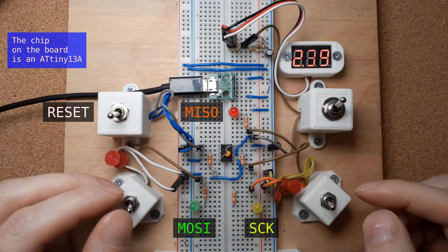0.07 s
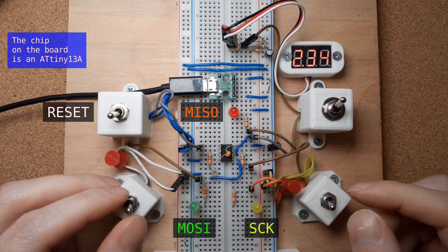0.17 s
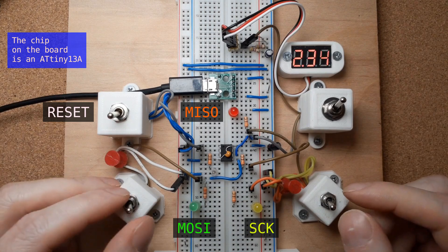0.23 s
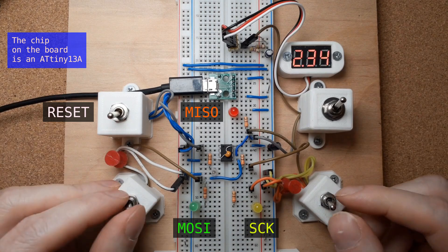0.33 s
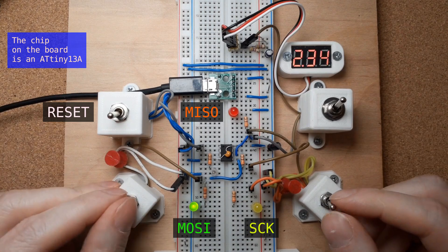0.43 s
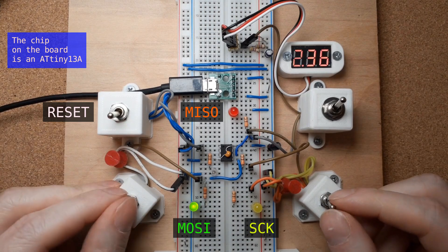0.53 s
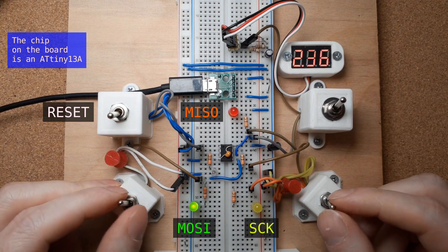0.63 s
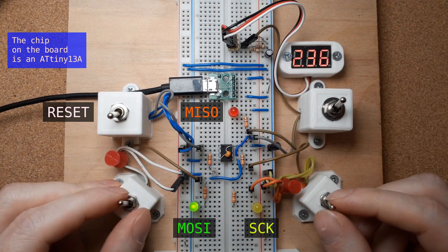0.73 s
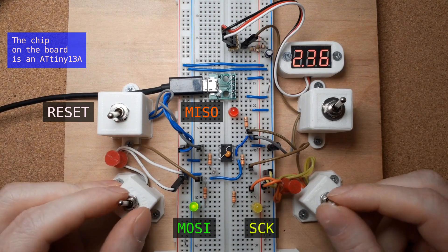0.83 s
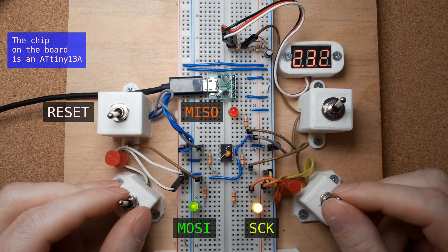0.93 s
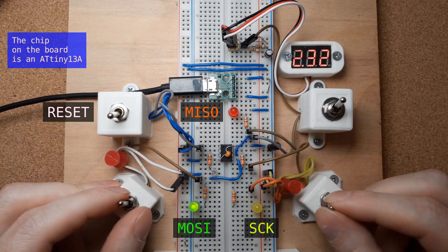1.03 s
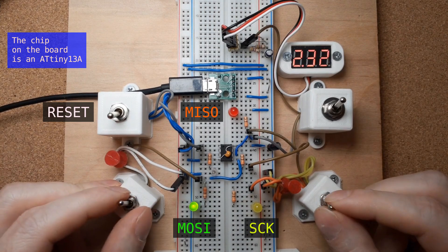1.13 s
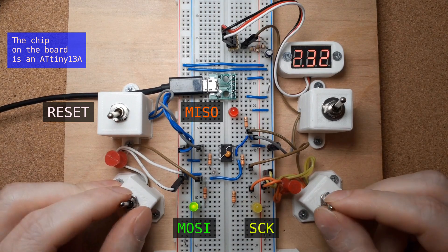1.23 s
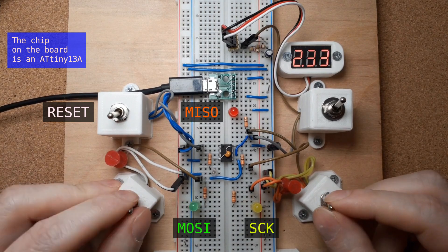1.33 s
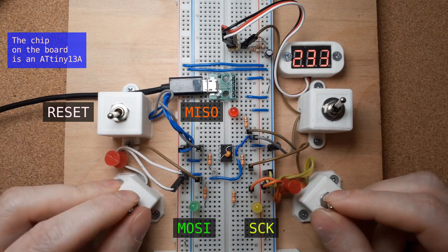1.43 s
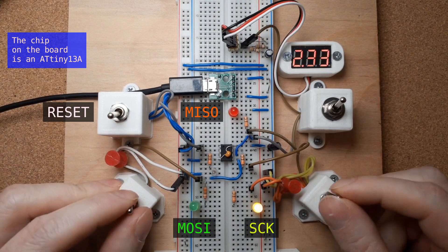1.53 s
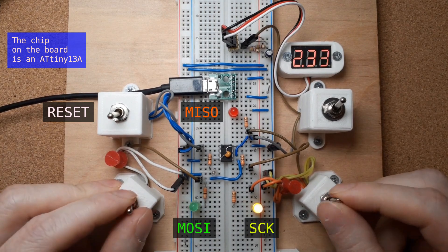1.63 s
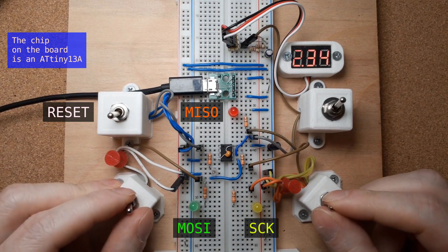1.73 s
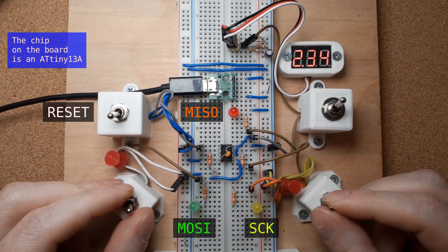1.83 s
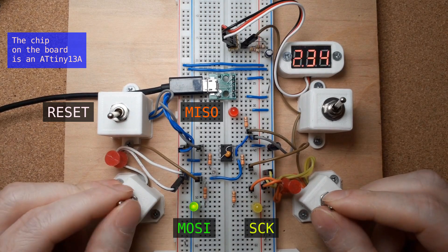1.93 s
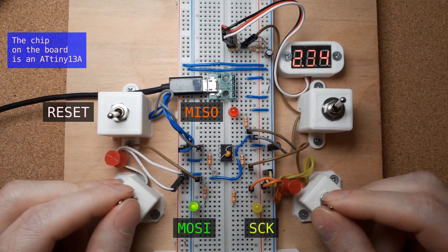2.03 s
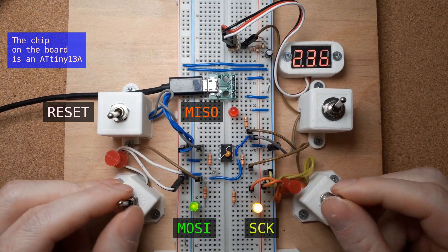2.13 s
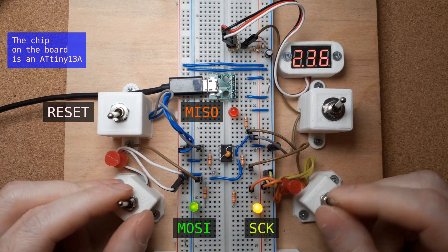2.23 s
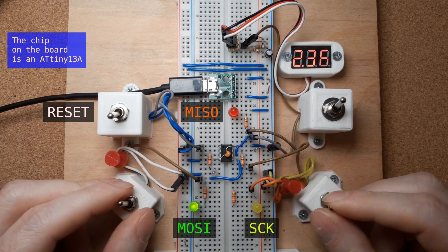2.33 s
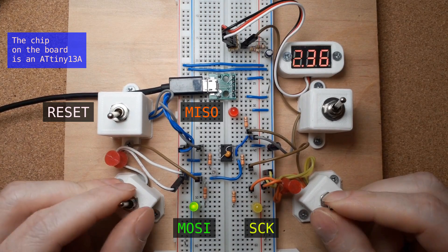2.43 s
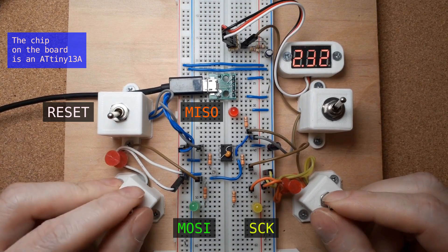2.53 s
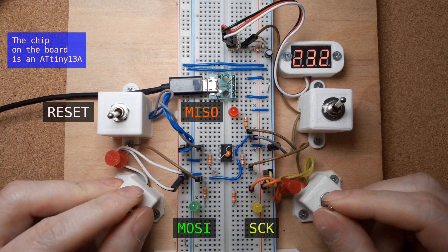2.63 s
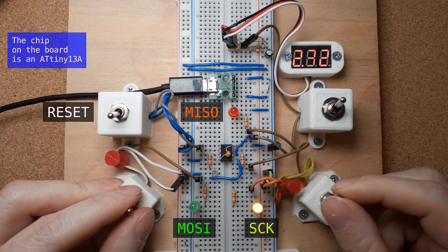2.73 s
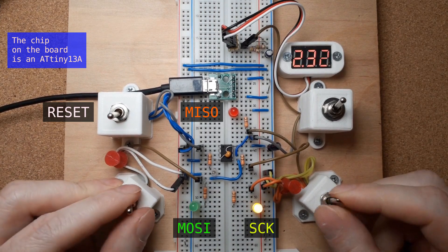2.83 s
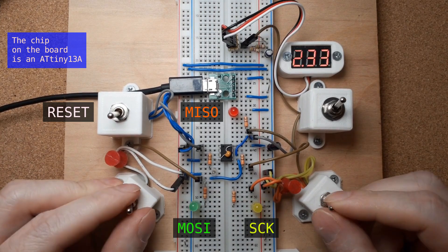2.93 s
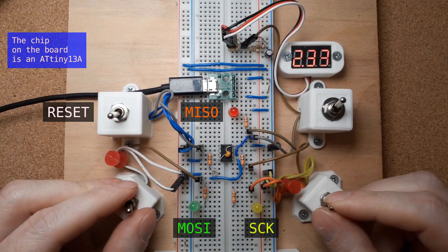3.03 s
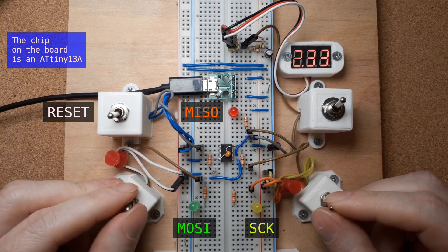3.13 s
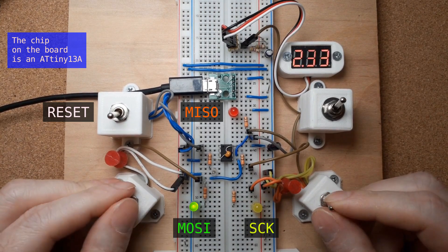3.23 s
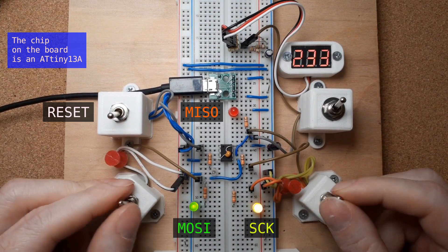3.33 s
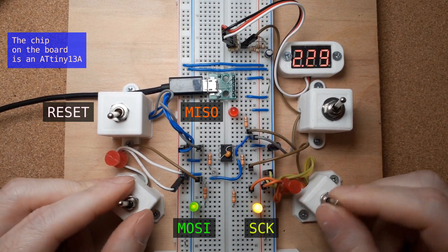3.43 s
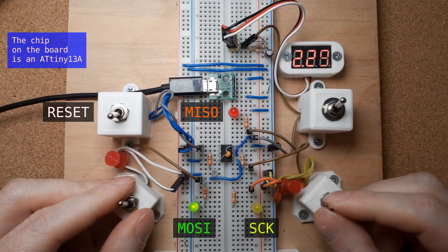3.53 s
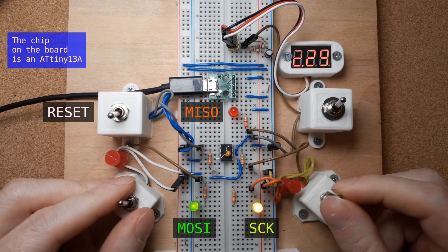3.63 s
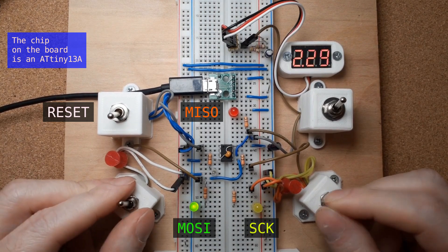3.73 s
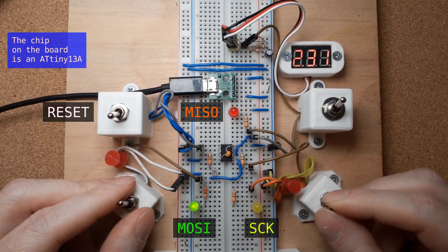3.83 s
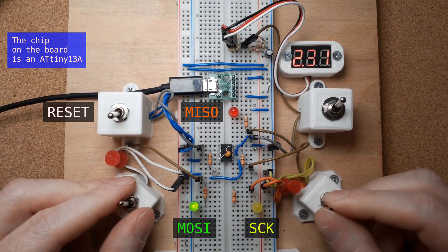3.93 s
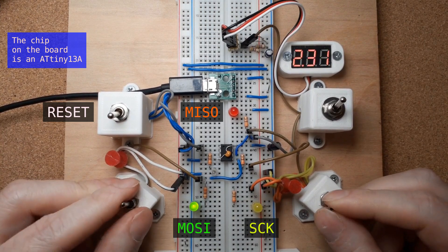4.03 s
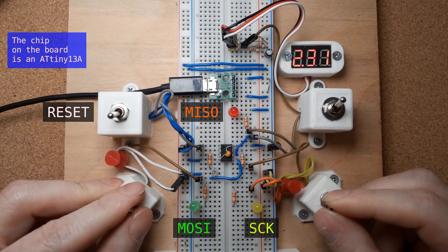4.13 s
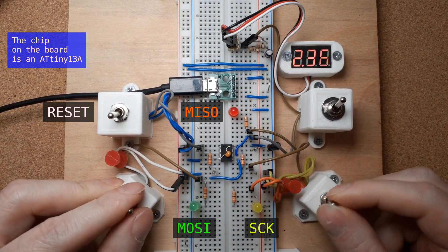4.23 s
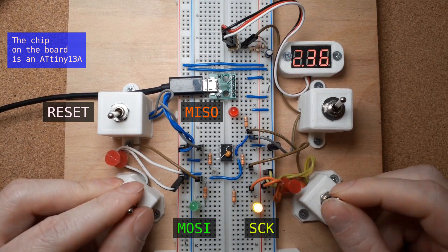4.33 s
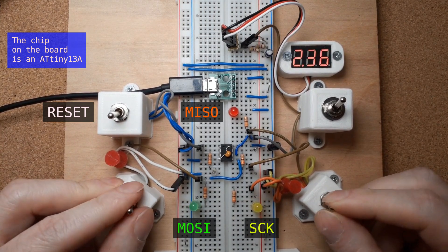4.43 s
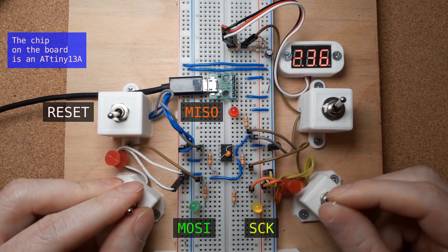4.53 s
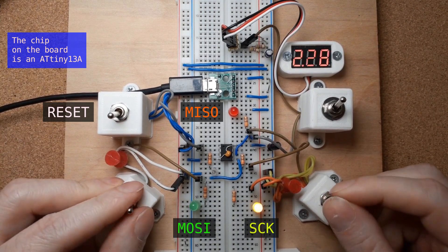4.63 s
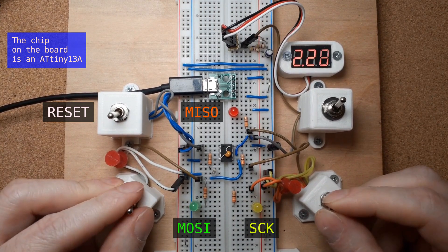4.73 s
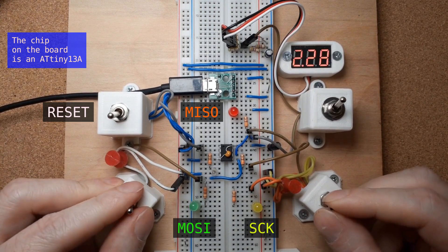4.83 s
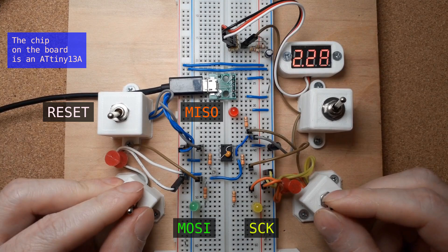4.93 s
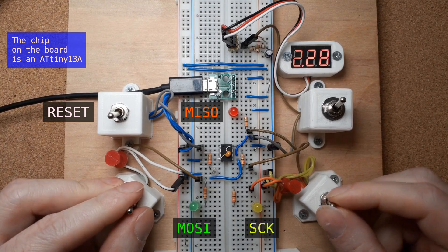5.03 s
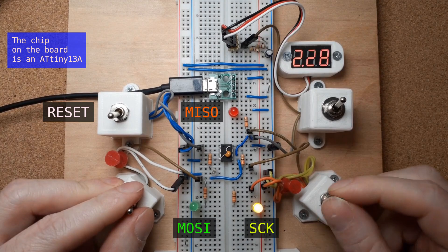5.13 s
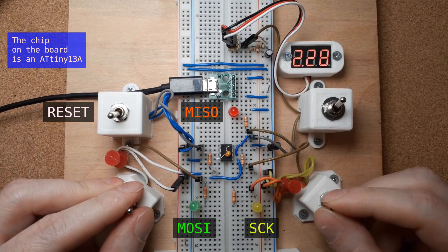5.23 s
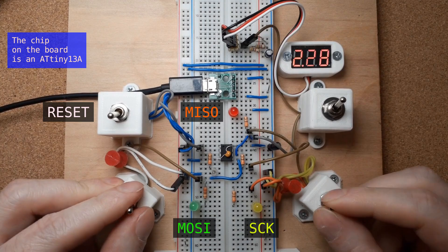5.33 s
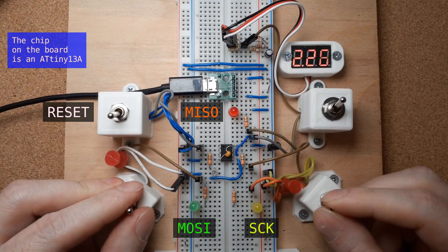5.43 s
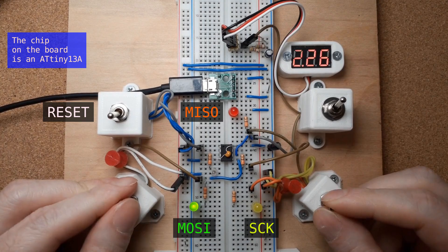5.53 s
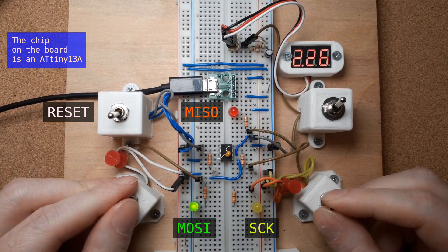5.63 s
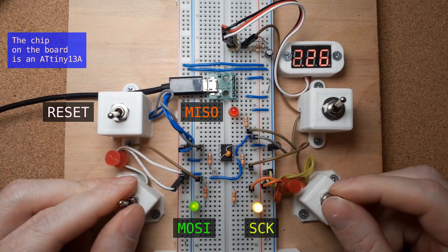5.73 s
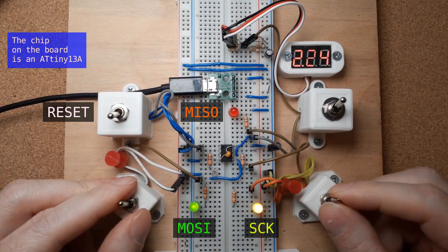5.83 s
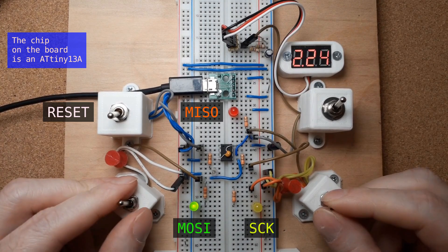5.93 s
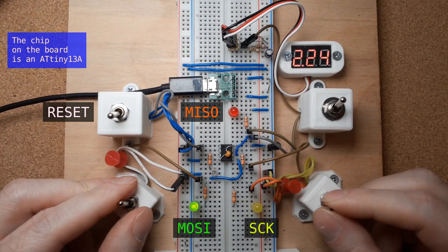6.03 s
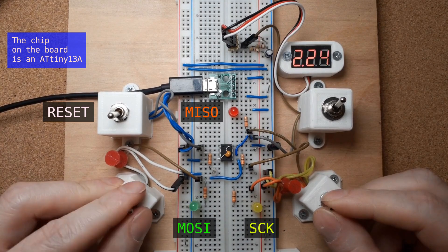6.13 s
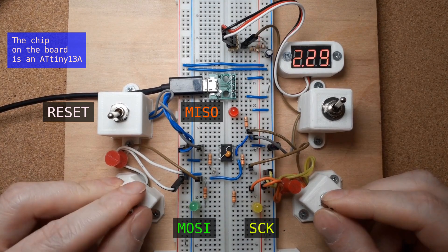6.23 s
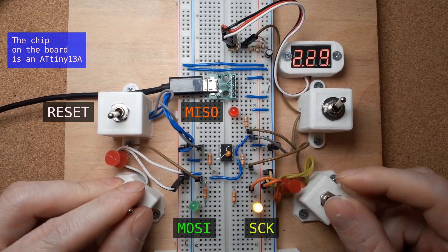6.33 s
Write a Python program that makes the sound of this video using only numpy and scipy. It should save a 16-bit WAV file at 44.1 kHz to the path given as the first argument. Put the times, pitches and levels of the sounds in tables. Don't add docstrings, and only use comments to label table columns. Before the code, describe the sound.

A faint room hiss with a barely audible distant fan tone fades in over the first 0.3 seconds, with very soft fingertip taps and nail ticks at 0.4. At 0.52 the left toggle switch snaps on. The right one clicks at 0.95, 1.11, 1.6 and 1.76, with a bright left snap off at 1.42. Left on at 2.03, right at 2.2, 2.34, then a very loud left off at 2.6, right at 2.8 and 2.95. Left on at 3.25, right clicks at 3.4, 3.54, 3.7, 3.83, left off at 4.14. Right flips in quick pairs from 4.34 to 5.3, left on at 5.61, right at 5.8 and 5.96, left off at 6.22, ending about 6.4. Each flip is a tiny tick, a hard plastic-and-metal crack, a weak rebound, and a low wooden bench thump with a short dry room tail. Light skin scuffs sit between, close stereo.

```python
import sys
import numpy as np
from scipy import signal
from scipy.fft import rfft, irfft, next_fast_len
from scipy.io import wavfile
from scipy.ndimage import uniform_filter1d

SR = 44100
rng = np.random.default_rng(int(sys.argv[2]) if len(sys.argv) > 2 else 0)


def generate_wav(sig):
    pcm = np.round(np.clip(np.atleast_2d(sig).T, -1, 1) * 32767).astype(np.int16)
    wavfile.write(sys.argv[1], SR, pcm)


def volts_from_db(level):
    exponent = np.asarray(level, float) / 20
    return 10 ** exponent


N = 281799
SIZE = 2048
PEAK_AT = 128

# (frequency [Hz], level [dB per Hz])
HISS = [(40, -20), (62, -13.5), (90, -28), (190, -36), (262, -24), (420, -39), (686, -43.5), (762, -40),
        (1140, -46), (1500, -45.5), (1600, -41), (1740, -48.5), (15500, -57.5), (16000, -75.5)]
# (frequency [Hz], likeness [0-1])
HISS_SAME = [(40, 0.85), (300, 0.94), (2000, 0.27), (16000, 0.89)]
# (frequency [Hz], level [dB rms])
HUM = [(764.4, -84), (1604, -87)]
# (time [s], level [dB])
FADE_IN = [(0, -12), (.15, -12), (.17, 0.5), (.3, 2.5), (6.39, 2.5)]
# (time [s], level [dB])
SWAY = [(0, -60), (.45, -62), (.54, -38.5), (.9, -41), (.98, -31), (1.27, -34.5), (1.37, -55), (1.46, -37),
        (2.1, -32.5), (3.8, -31.5), (4.3, -34.5), (4.8, -33), (5.15, -45), (5.25, -31), (5.47, -40.5),
        (6.07, -35), (6.15, -48), (6.27, -37.5)]
# (frequency [Hz], level [dB per Hz])
TREMOR = [(30, -15.5), (50, 0), (80, -4), (130, -14), (200, -31.5), (400, -54)]
# (frequency [Hz], t60 [s])
ROOM = [(200, 0.55), (1000, 0.081), (3000, 0.14), (7000, 0.14), (15000, 0.17)]
# (frequency [Hz], level [dB])
ROOM_COLOUR = [(150, 0.5), (600, -1), (1500, 6.5), (2500, 0), (5000, -1), (9000, -1), (12000, -2.5),
               (14500, -7), (16000, -11)]
# (frequency [Hz], level [dB per Hz])
BENCH_RING = [(45, -32.5), (90, 5.5), (140, -7.5), (260, 7.5), (450, 4.5), (700, -9.5), (1500, -43)]
# (frequency [Hz], level [dB per Hz])
RUB_COLOUR = [(150, -8.5), (500, -1.5), (1500, -9), (3000, -10.5), (5000, -13), (15500, -20), (16000, -60)]
# (time [s], level [dB])
GRIP = [(.1, -81), (.7, -73.5), (3.1, -74), (3.5, -76), (4.2, -73.5), (4.9, -75.5), (6.25, -75),
        (6.39, -61.5)]
# (start [s], end [s], level [dB], left-right [dB])
SCUFFS = [
    (0.73, 0.86, -68, -19),
    (0.83, 0.905, -60, -18),
    (0.9, 0.946, -64, -10),
    (3.192, 3.233, -51.5, 5),
    (3.355, 3.414, -57, -1),
    (3.752, 3.795, -59, -24),
    (5.099, 5.14, -59, -5.5),
    (5.524, 5.583, -62, 5.5),
]
# (frequency [Hz], level [dB per Hz])
SCUFF_COLOUR = [(200, -12), (600, -1), (1300, 3.5), (2500, -3.5), (4000, -22), (16000, -31)]
# (time [s], level [dB], left-right [dB])
TICKS = [(0.4026, -46.5, 2), (.409, -50.5, 5), (0.4383, -49, 0.5), (0.4695, -28, 1.5), (0.9094, -38.5, -2),
         (1.298, -56, 0), (1.311, -55, 6), (2.013, -46, 3), (2.1747, -45.5, -1), (2.197, -49, -11),
         (2.5195, -50.5, 4), (2.7483, -50, -1), (2.7708, -39, 1.6), (3.2307, -52, -13), (3.6604, -41, 7.5),
         (3.675, -44, -12), (3.7891, -52, 9), (4.2912, -55, -7), (4.321, -42.5, -3), (4.425, -44.5, -1),
         (4.615, -41.5, -1), (4.7378, -40.5, 1.1), (5.122, -38.5, -3), (5.258, -39.5, -2.3),
         (5.5641, -44, 7), (5.5845, -41, -3), (5.7748, -43, -4), (5.8887, -41.5, -1.5), (6.1807, -46, 3),
         (6.3837, -39.5, -4)]
# (time [s], tick [dB], dull part under 1 kHz [dB], left-right [dB])
TAPS = [(0.1644, -66, -68, 3), (0.293, -77, -60, 9), (0.6802, -68, -53.5, 5), (0.8835, -58, -66, -18),
        (0.9235, -54, -58, -3), (0.698, -75, -57, 3), (1.0275, -51, -67, -1), (1.3615, -62.5, -61, 4),
        (1.418, -30.5, -29, 1.5), (1.5728, -59, -53, -3), (1.9906, -40.5, -45, 3), (2.5954, -30.5, -31, -1),
        (2.8771, -52, -66, 0), (3.0967, -49, -46.5, 4), (3.2005, -56, -48, 1), (3.2115, -38, -43, 3.5),
        (3.2214, -47, -63, -8), (3.361, -58, -56, 1), (3.373, -51, -54, -1.5), (3.3941, -45, -46, -2),
        (3.487, -55, -42, 1), (3.493, -38, -38, 2), (3.771, -71, -50, -15), (3.8195, -69, -36, -4),
        (4.0631, -45.5, -61, 8), (4.1333, -78.5, -32, 4.5), (5.5477, -53, -45.5, 2), (5.951, -54, -46.5, 0)]
# (frequency [Hz], width [Hz], level [dB])
TOUCH_BODY = [(1290, 43, -2.5), (2070, 580, -10), (3930, 170, -8.5), (6140, 960, -5), (7160, 150, -4.5),
              (8800, 500, -5), (10900, 400, -9.5), (12300, 270, -8.5), (13400, 130, -12), (14800, 400, -10)]
# (lead [s], first pitch [Hz], last pitch [Hz], glide [s], rise [s], t60 [s], level [dB])
LEFT_WAVE = [
    (.0045, 230, 90.6, 0.0045, 0.003, 0.055, -0.5),
    (.0045, 220, 87.9, 0.0035, 0.003, 0.075, -0.5),
]
RIGHT_WAVE = [
    (0.0082, 153, 79.9, 0.012, 0.0014, 0.13, -0.59),
    (.0095, 242, 75.1, 0.0041, 0.0029, 0.066, -0.33),
]
# (frequency [Hz], level [dB], t60 [s])
LEGS = (28, -15.5, 0.76)
# (frequency [Hz], level [dB], t60 [s])
LEFT_KNOCK = [(250, -22, .022), (420, -18, .022), (780, -17, .02), (1400, -33, .06)]
RIGHT_KNOCK = [(265, -17, .022), (420, -16, .024), (700, -21, .022), (1800, -31, .065)]
# (time [s], low [dB], middle [dB], high knock [dB])
SEATING = [(0.52, 8, 12, 5), (0.95, 10, 8, 2), (1.11, -7, 1, -1), (1.42, 12, 6, 2), (1.61, 9, 9, 13),
           (1.76, 9, -1, 0), (2.03, 17, 1, 10), (2.22, 17, 12, 10), (2.34, 13, 8, 9), (2.6, 15, 11, 8),
           (2.79, 9, 7, 9), (2.95, 16, 10, 14), (3.25, 9, -1, 7), (3.42, 16, 10, 11), (3.54, 8, 2, 4),
           (3.7, 17, 14, 10), (3.83, 4, 4, 2), (4.14, 16, 14, 10), (4.34, 17, 14, 1), (4.48, 3, 2, 2),
           (4.64, 11, 5, 6), (4.79, 2, 5, 3), (5.16, -2, -3, 3), (5.3, 5, 2, 4), (5.61, 12, 9, 9),
           (5.79, 16, 7, -4), (5.96, 15, 5, 0), (6.22, 13, 12, 13)]
# (time of main swing [s], peak level [dB], pitch ratio set by how the hand holds the housing down)
LEFT_ON_THUMPS = [
    (0.5223, -24.3, 0.96),
    (2.0335, -22.4, 1.11),
    (3.2515, -19.8, 1.11),
    (5.6118, -19.1, 1.08),
]
LEFT_OFF_THUMPS = [
    (1.425, -20.8, 1.27),
    (2.6012, -23.5, 1.3),
    (4.1422, -21.5, 1.3),
    (6.2195, -20.6, 1.4),
]
RIGHT_ON_THUMPS = [(0.9552, -25.0, 0.87), (1.6139, -23.6, 0.95), (2.2235, -26.2, 0.83),
                   (2.7982, -27.6, 0.93), (3.429, -25.1, 0.85), (3.706, -27.0, 0.86), (4.3483, -26.1, 0.98),
                   (4.6425, -27.1, 0.97), (5.1692, -28.2, 0.97), (5.801, -26.4, 0.93)]
RIGHT_OFF_THUMPS = [(1.1149, -21.0, 0.89), (1.764, -19.9, 1.05), (2.3446, -24.7, 1.01),
                    (2.9599, -22.5, 1.08), (3.544, -21.4, 1.05), (3.8357, -18.0, 1.01),
                    (4.4814, -18.8, 1.07), (4.7923, -17.1, 1.08), (5.3087, -19.3, 1.11),
                    (5.9682, -22.7, 1.02)]
# (frequency [Hz], width [Hz], level [dB])
LEFT_BODY = [(1325, 170, 10), (3210, 160, 1.5), (2130, 1400, 0.5), (4150, 1500, -2.5), (4700, 53, -5.5),
             (6060, 210, -1), (7330, 590, -3.5), (8950, 150, -18), (10050, 1000, -14.5), (11080, 140, -9),
             (13100, 77, -9), (13200, 220, -14.5), (14800, 280, -14.5), (16300, 130, -25)]
RIGHT_ON_BODY = [(1290, 47, -5.5), (1700, 1400, 2.5), (2310, 24, 1), (3422, 70, -0.5), (4090, 97, -4.5),
                 (5450, 450, -3), (6704, 520, -1.5), (7830, 840, -7), (4200, 760, -7), (8900, 210, -8),
                 (10740, 400, -10), (10530, 670, -8), (12000, 410, -8), (14400, 300, -9)]
RIGHT_OFF_BODY = [(1330, 33, 1), (1834, 160, -1), (2305, 40, -4), (3180, 350, -8), (4080, 360, -7),
                  (4840, 50, -11), (4940, 50, -12), (6970, 2100, -3), (8290, 350, -4.5), (9600, 57, -6),
                  (11440, 1100, -4), (12600, 130, -25), (13500, 230, -45.5), (14600, 470, -6)]
# (time [s], frequency [Hz], lift [dB], frequency [Hz], lift [dB])
LOW_SINGING = [(0.52, 2440, 8, 3220, 9), (0.95, 1730, 10, 3220, 10), (1.11, 1730, 11, 2050, 2),
               (1.42, 1220, -9, 1790, 7), (1.61, 1730, 4, 1980, -6), (1.76, 1500, 7, 2620, 8),
               (2.03, 2530, 13, 3570, 7), (2.22, 1730, 11, 3110, 6), (2.34, 1850, 4, 2620, 4),
               (2.6, 1980, 6, 2620, 9), (2.79, 1220, -4, 3450, -9), (2.95, 1920, 6, 2620, 10),
               (3.25, 1500, -7, 2620, 12), (3.42, 1980, 3, 2360, -6), (3.54, 1400, -4, 1730, 8),
               (3.7, 1730, 7, 2710, 6), (3.83, 1730, 6, 2280, -6), (4.14, 1790, 6, 2130, 8),
               (4.34, 1140, 8, 1790, 12), (4.48, 1350, -9, 1670, 7), (4.64, 1850, 11, 3330, 5),
               (4.79, 1560, 10, 3450, 6), (5.16, 2440, 6, 3330, -6), (5.3, 1220, -9, 1730, 2),
               (5.61, 1260, 7, 2710, 13), (5.79, 1850, 6, 3450, 8), (5.96, 1350, -9, 1730, 5),
               (6.22, 2200, 7, 2620, 10)]
HIGH_SINGING = [(0.52, 3920, 11, 6170, -5), (0.95, 7320, 2, 9720, 6), (1.11, 7110, 5, 8200, -8),
                (1.42, 3700, 5, 7530, 4), (1.61, 6000, 6, 6720, 5), (1.76, 6000, 5, 7110, 10),
                (2.03, 4030, -6, 4780, 5), (2.22, 6000, 3, 7110, 7), (2.34, 6910, 6, 9450, -9),
                (2.6, 3920, 6, 5830, -9), (2.79, 4150, 7, 5830, 6), (2.95, 6170, 6, 7110, 7),
                (3.25, 4030, 9, 5830, -7), (3.42, 3920, 5, 7530, 7), (3.54, 5830, 9, 6910, 6),
                (3.7, 4030, 8, 6000, 4), (3.83, 6000, 6, 8680, -9), (4.14, 4640, -5, 5200, 6),
                (4.34, 5830, 4, 7320, 11), (4.48, 4030, -9, 4640, -7), (4.64, 6170, 4, 7320, 5),
                (4.79, 6170, 6, 7740, 7), (5.16, 4150, 7, 4780, 8), (5.3, 4780, -5, 7320, 5),
                (5.61, 4780, 8, 5830, 5), (5.79, 5510, -5, 6720, 5), (5.96, 6000, 8, 7320, 7),
                (6.22, 7110, -5, 10000, -8)]
# (fixed part [Hz], share of the pitch [ratio])
SINGING_WIDTH = (170, 0.05)
# (time of contact strike [s], level [dB], treble over middle [dB], lever tick ahead [s], tick [dB])
LEFT_ON_FLIPS = [
    (.5205, -10.5, 2, 0.0092, -30.5),
    (2.0315, -11.5, 1, .0081, -25.5),
    (3.2498, -12, 0.5, .0096, -31),
    (5.6118, -10.5, 4, .013, -21.5),
]
LEFT_OFF_FLIPS = [
    (1.424, -7, 4.5, .003, -28.5),
    (2.6, -5.5, 4.5, .003, -31.5),
    (4.1407, -6, 3, .0032, -21),
    (6.2179, -9, -0.5, .0059, -28),
]
RIGHT_ON_FLIPS = [
    (.9472, -12, 2, .002, -27),
    (1.608, -17, -5.5, 0.0026, -17),
    (2.217, -18.5, -8.5, .0025, -12),
    (2.791, -7.5, -1.3, .0025, -24.5),
    (3.4225, -15.5, 2, 0.0031, -18.5),
    (3.7008, -18.5, -2, .0033, -18.5),
    (4.3422, -11, 1, .0032, -17.5),
    (4.6364, -15, -1.5, .0019, -12),
    (5.1622, -7.5, -0.8, 0.0012, -25.5),
    (5.793, -7, 3.5, .0025, -24),
]
RIGHT_OFF_FLIPS = [
    (1.1075, -16.5, 1, .0033, -22.5),
    (1.758, -20.5, -6, .0031, -13),
    (2.3388, -10.5, 3, 0.0021, -22),
    (2.9544, -8, -3, .002, -24.5),
    (3.5385, -19, -9, .0024, -13),
    (3.8299, -16.5, 1, 0.0038, -18.5),
    (4.4756, -15.5, -4, 0.0058, -17),
    (4.7857, -15.5, -9, 0.0013, -14),
    (5.3025, -14, -4.5, 0.0029, -18),
    (5.9614, -15, 0, .0014, -18.5),
]
# (strike left-right [dB], tick left-right [dB], tick treble [dB], rebound after [s],
# rebound under strike [dB], rebound treble [dB], spring slip under strike [dB])
LEFT_ON_THROW = (.6, 4, 8, .0065, -17, -8, -13)
LEFT_OFF_THROW = (2.5, 6, 10, .0043, -18, -8, -30)
RIGHT_ON_THROW = (2.1, 1.1, 9, .0048, -18, -3, -30)
RIGHT_OFF_THROW = (.6, -1.1, 8, .0035, -17, -8, -30)


def evened(x):
    return x / np.sqrt(np.mean(x ** 2) + 1e-20)


def peaked(x, size):
    return x / np.sqrt(uniform_filter1d((x ** 2).mean(0), size).max())


def ragged(count, size):
    return evened(uniform_filter1d(rng.standard_normal(count), size=size))


def read(points, hz):
    f, value = np.transpose(points)
    return np.interp(np.log(hz + 1), np.log(f + 1), value)


def curve(rows):
    s, db = np.transpose(rows)
    return np.interp(np.arange(N) / SR, s, db)


def nearest(rows, s):
    return min(rows, key=lambda row: abs(row[0] - s))


def add(mix, s, sound, pan_db):
    part = mix[:, round(s * SR):][:, :sound.shape[1]]
    part += (sound * volts_from_db([[pan_db / 2], [-pan_db / 2]]))[:, :part.shape[1]]


def noise(spectrum, same):
    size = next_fast_len(N)
    hz = np.fft.rfftfreq(size, 1 / SR)
    a, b = rfft(rng.standard_normal((2, size)))
    like = np.clip(read(same, hz), -1, 1)
    pair = np.array([a, like * a + np.sqrt(1 - like ** 2) * b])
    return evened(irfft(pair * volts_from_db(read(spectrum, hz)), size)[:, :N])


def mode(t, hz, db, t60):
    return volts_from_db(db - 60 * t / t60) * np.sin(2 * np.pi * hz * t)


def causal(db):
    fold = irfft(db * np.log(10) / 20, SIZE)
    fold[..., 1:SIZE // 2] *= 2
    fold[..., SIZE // 2 + 1:] = 0
    return np.exp(rfft(fold))


def floor():
    t = np.arange(N) / SR
    lines = 0
    for hz, db in HUM:
        wander = np.cumsum(ragged(N, 2000)) * 3.0 / SR
        lines = lines + np.sqrt(2) * volts_from_db(db) * np.sin(2 * np.pi * (hz * t + wander))
    return volts_from_db(-66.5) * noise(HISS, HISS_SAME) + lines


def sway(sway_hz=20.9, tremor_db=-21.0):
    turns = sway_hz * np.arange(N) / SR
    rock = np.sqrt(2) * np.sin(2 * np.pi * turns + np.array([[0], [.3]]))
    return volts_from_db(curve(SWAY)) * (rock + volts_from_db(tremor_db) * noise(TREMOR, HISS_SAME))


def room(x):
    taps = rng.standard_normal((2, SR // 2))
    hz, t, z = signal.stft(taps, SR, nperseg=128)
    clumps = uniform_filter1d(rng.standard_normal(z.shape), size=3, axis=1)
    z = z * volts_from_db(3.5 * evened(uniform_filter1d(clumps, size=4)))
    decay_db = read(ROOM_COLOUR, hz)[:, None] - 60 * t / read(ROOM, hz)[:, None]
    tail = signal.istft(z * volts_from_db(decay_db), SR, nperseg=128)[1]
    tail = tail * np.clip(np.arange(tail.shape[1]) / SR / 0.011, 0, 1)
    return signal.fftconvolve(x, tail / np.linalg.norm(tail[0]), axes=1)[:, :N]


def bench_ring(blows, t60=0.17):
    t = np.arange(SR // 2) / SR
    tail = noise(BENCH_RING, HISS_SAME)[:, :len(t)] * volts_from_db(-60 * t / t60)
    return signal.fftconvolve(blows, tail / np.linalg.norm(tail[0]), axes=1)[:, :N]


def rub(swell_s=0.0022, travel_db=-50, early_s=0.017, squeeze_db=8, squeeze_s=0.042):
    t, travel = np.arange(N) / SR, 0
    squeeze = sum(np.exp(-((t - s) / squeeze_s) ** 2) for s, *_ in RIGHT_ON_THUMPS)
    for s, *_ in RIGHT_ON_THUMPS + RIGHT_OFF_THUMPS:
        travel = travel + (t < s) * np.exp(np.minimum(t - s + early_s, 0) / swell_s)
    grain = volts_from_db(4.5 * ragged(N, 120))
    pressure = volts_from_db(curve(GRIP) + squeeze_db * squeeze) + volts_from_db(travel_db) * travel
    mix = pressure * evened(grain * noise(RUB_COLOUR, HISS_SAME))
    catch = volts_from_db(2.0 * ragged(N, 40))
    scuff = evened(grain * catch * noise(SCUFF_COLOUR, HISS_SAME))
    for start, end, db, pan_db in SCUFFS:
        stroke = scuff[:, round(start * SR):round(end * SR)]
        swell = np.sin(np.pi * np.linspace(0, 1, stroke.shape[1]) ** 1.2)
        add(mix, start, volts_from_db(db) * stroke * swell, pan_db)
    return mix


def burst(rise_s, fall_s):
    t = (np.arange(SIZE) - PEAK_AT) / SR
    shape = np.exp(np.where(t < 0, t / rise_s, -t / fall_s))
    loose = np.exp(-abs(t) / np.where(t < 0, 0.66 * rise_s, 2.5 * fall_s))
    shape = shape + volts_from_db(-5.5) * loose
    shape = shape * volts_from_db(3.0 * ragged(SIZE, 14))
    force = rng.standard_normal((2, SIZE)) * shape
    for _ in range(4):
        z = rfft(force)
        force = irfft(z / abs(z), SIZE)
        force = force * shape / np.sqrt(abs(uniform_filter1d(force ** 2, size=16)) + 1e-9)
    return force


def colour(body, tilt_db, grip_hz, spread_db=1.5, loss=0.07, split_hz=4500):
    hz = np.fft.rfftfreq(SIZE, 1 / SR)
    f, width, db = np.transpose(body)[:, :, None]
    height = volts_from_db(db + spread_db * rng.standard_normal(f.shape))
    modes = height / (1 + (2 * (hz - f) / (width + grip_hz + loss * f)) ** 2)
    power = (modes ** 2).sum(0)
    high = 1 / (1 + (split_hz / (hz + 1)) ** 6)
    middle_share = (1 - high) / (power * (1 - high)).sum()
    share = middle_share + volts_from_db(2 * tilt_db) * high / (power * high).sum()
    small = 1 / (1 + (1120 / (hz + 1)) ** 9)
    return 10 * np.log10(power * share * (small + 0.24) + 1e-12)


def ring(mix, air, s, db, pan_db, level_db, force, paths=1):
    sound = volts_from_db(db) * peaked(irfft(paths * causal(level_db) * rfft(force), SIZE), size=27)
    blurred_db = 10 * np.log10(uniform_filter1d(volts_from_db(2 * level_db), size=60))
    spread = irfft(causal(blurred_db), SIZE) * np.ones((2, 1))
    add(mix, s - PEAK_AT / SR, sound, pan_db)
    add(air, s, spread * np.linalg.norm(sound) / np.linalg.norm(spread), 0)


def touches(mix, air, tick_s=.0017, tap_s=.0034):
    knock = signal.butter(2, [170, 900], "band", fs=SR)
    t = np.arange(SIZE) / SR
    give = (1 - np.exp(-t / 0.0061)) * mode(t, hz=100, db=-7.5, t60=0.059)
    push = give * np.ones((2, 1))
    rows = [(s, db, -37 + 0.44 * db, pan_db, tick_s) for s, db, pan_db in TICKS]
    rows += [(*row, tap_s) for row in TAPS]
    for s, db, dull_db, pan_db, length in rows:
        force = burst(0.00035, length)
        ring(mix, air, s, db + 0.5, pan_db, colour(TOUCH_BODY, -14.5, grip_hz=900), force)
        dull = peaked(signal.lfilter(*knock, force), size=200)
        add(mix, s - PEAK_AT / SR, volts_from_db(dull_db) * dull, pan_db)
        add(mix, s - .004, volts_from_db(0.65 * dull_db) * push, pan_db / 4)


def thumps(rows, wave, knock, pan_db, knock_db):
    t, mix = np.arange(SR // 2) / SR, np.zeros((2, N))
    lead, first_hz, last_hz, glide, rise, t60, ear_db = np.transpose(wave)[:, :, None]

    def turns(u):
        return last_hz * u + (first_hz - last_hz) * glide * (1 - np.exp(-u / glide))

    def swell(u):
        return (1 - np.exp(-u / rise)) ** 2 * volts_from_db(-60 * u / t60)

    ahead = wave[0][0]
    u = np.maximum(t - ahead + lead, 0)
    legs, touch = mode(u, *LEGS), 1 - np.exp(-u / rise)
    for s, db, ratio in rows:
        _, low_db, middle_db, high_db = nearest(SEATING, s)
        cycle = np.cos(2 * np.pi * ratio * (turns(u) - turns(lead)))
        bend = volts_from_db(ear_db) * swell(u) / swell(lead) * cycle
        body = volts_from_db(knock_db + np.array([low_db, middle_db, high_db, high_db / 2]))
        knocks = sum(g * mode(u, ratio * hz, *rest) for g, (hz, *rest) in zip(body, knock))
        add(mix, s - ahead, volts_from_db(db) * (bend + touch * (knocks + legs)), pan_db)
    return mix


def rattle(flips, throw, slip_s=.0036):
    pan_db, tick_pan_db, tick_tilt_db, after, under_db, after_tilt_db, slip_db = throw
    rows = []
    for s, db, tilt_db, ahead, tick_db in flips:
        rows += [(s - ahead, tick_db, tick_pan_db, tick_tilt_db),
                 (s - slip_s, db + slip_db, tick_pan_db, tick_tilt_db),
                 (s, db, pan_db, tilt_db),
                 (s + after, db + under_db, pan_db, after_tilt_db)]
    return rows


def singing(s, hz):
    lifted = np.reshape(nearest(LOW_SINGING, s)[1:] + nearest(HIGH_SINGING, s)[1:], (-1, 2))
    base, share = SINGING_WIDTH
    return sum(db / (1 + (2 * (hz - f) / (base + share * f)) ** 2) for f, db in lifted)


def strikes(mix, air, rows, body, lag_s, rise_s, fall_s=.0011, shade_db=-6.0):
    hz = np.fft.rfftfreq(SIZE, 1 / SR)
    far = np.array([[lag_s > 0], [lag_s < 0]])
    shade = shade_db * (far - .5) / (1 + (5000 / (hz + 1)) ** 2)
    paths = causal(shade) * np.exp(-2j * np.pi * hz * abs(lag_s) * far)
    for s, db, pan_db, tilt_db in rows:
        level_db = colour(body, tilt_db, grip_hz=315) + singing(s, hz)
        ring(mix, air, s, db, pan_db / 2, level_db, burst(rise_s, fall_s), paths)


def scene():
    clicks, air = np.zeros((2, 2, N))
    left = rattle(LEFT_ON_FLIPS, LEFT_ON_THROW) + rattle(LEFT_OFF_FLIPS, LEFT_OFF_THROW)
    right_on = rattle(RIGHT_ON_FLIPS, RIGHT_ON_THROW)
    right_off = rattle(RIGHT_OFF_FLIPS, RIGHT_OFF_THROW)
    strikes(clicks, air, left, LEFT_BODY, lag_s=-.0007, rise_s=0.00076)
    strikes(clicks, air, right_on, RIGHT_ON_BODY, lag_s=.0006, rise_s=0.00092)
    strikes(clicks, air, right_off, RIGHT_OFF_BODY, lag_s=.0003, rise_s=0.00043)
    touches(clicks, air)
    blows = thumps(LEFT_ON_THUMPS, LEFT_WAVE, LEFT_KNOCK, pan_db=1.7, knock_db=14.5)
    blows -= thumps(LEFT_OFF_THUMPS, LEFT_WAVE, LEFT_KNOCK, pan_db=1.5, knock_db=11.0)
    blows += thumps(RIGHT_OFF_THUMPS, RIGHT_WAVE, RIGHT_KNOCK, pan_db=-3.0, knock_db=11.5)
    blows -= thumps(RIGHT_ON_THUMPS, RIGHT_WAVE, RIGHT_KNOCK, pan_db=-5.5, knock_db=-1.5)
    bench = blows + volts_from_db(-27.5) * bench_ring(blows) + sway()
    return clicks + volts_from_db(-22.0) * room(air) + bench + rub() + volts_from_db(curve(FADE_IN)) * floor()


def top_cut(x):
    return signal.sosfilt(signal.butter(12, 16480, fs=SR, output="sos"), x)


def record(dry):
    edge = signal.firwin(255, 16300, window=("kaiser", 7), fs=SR)
    mix = signal.oaconvolve(np.clip(dry, -1, 1), edge[None], "same")
    return top_cut(mix)


dry = scene()
out = record(dry)
generate_wav(out)
```